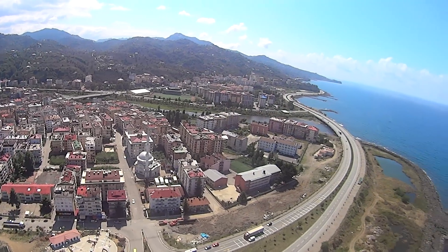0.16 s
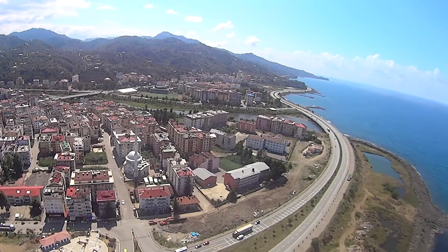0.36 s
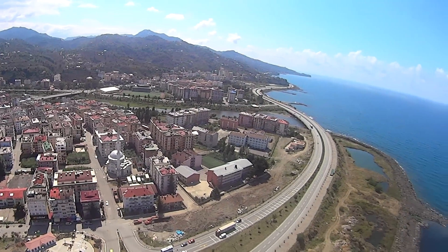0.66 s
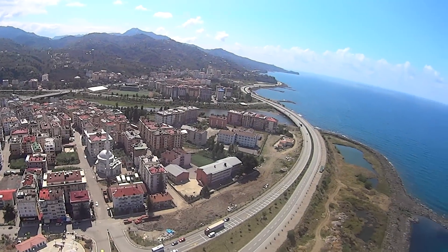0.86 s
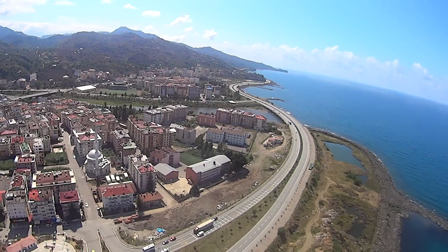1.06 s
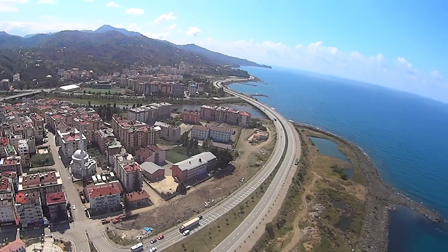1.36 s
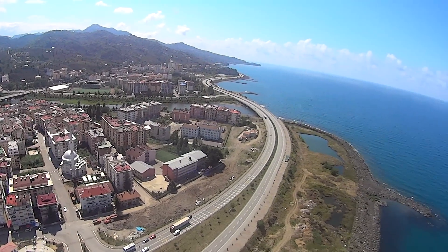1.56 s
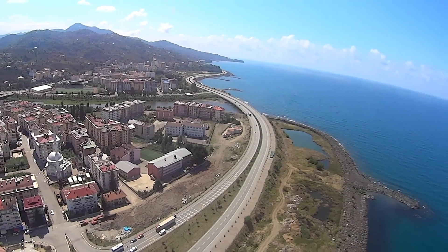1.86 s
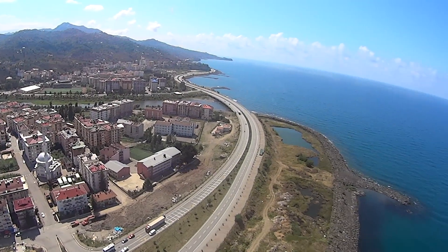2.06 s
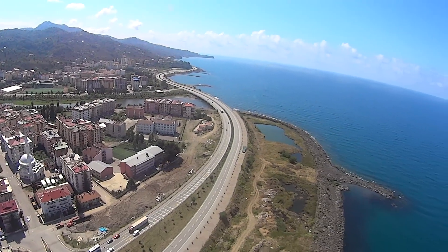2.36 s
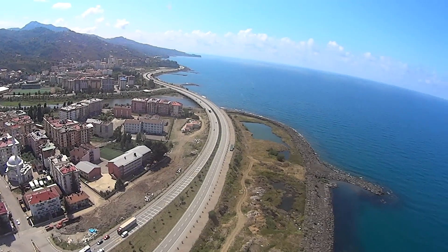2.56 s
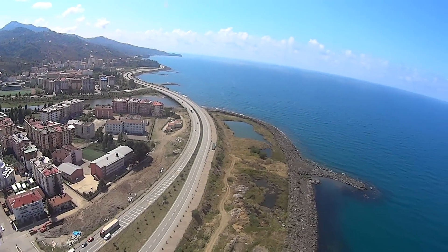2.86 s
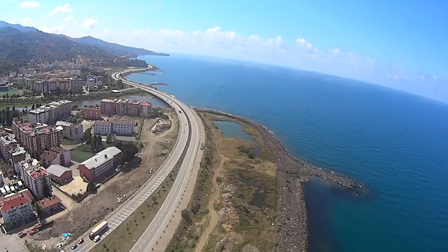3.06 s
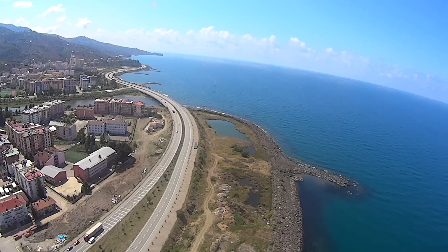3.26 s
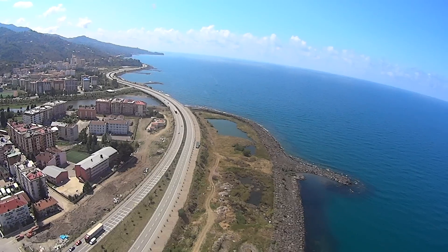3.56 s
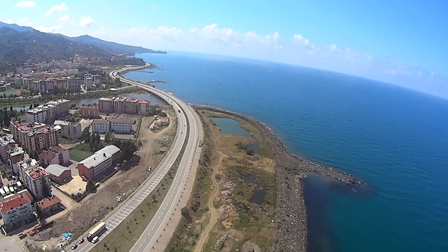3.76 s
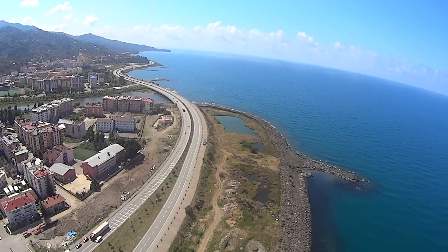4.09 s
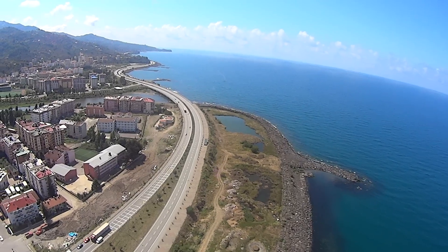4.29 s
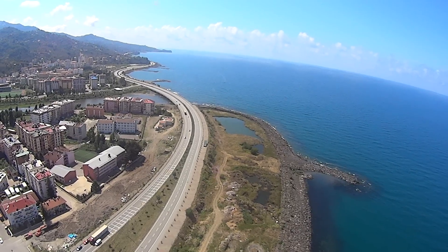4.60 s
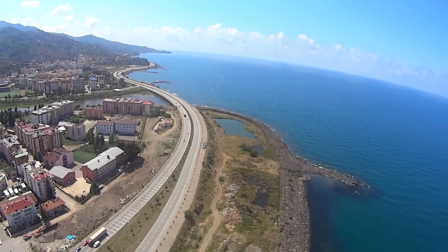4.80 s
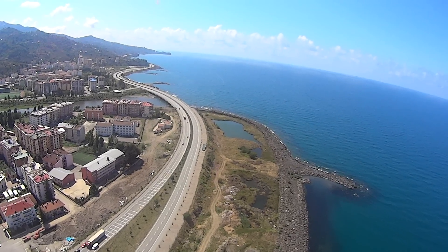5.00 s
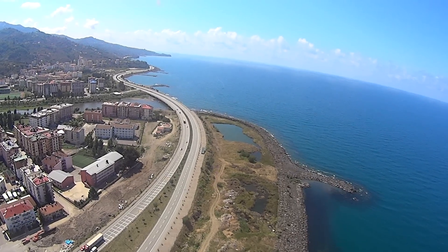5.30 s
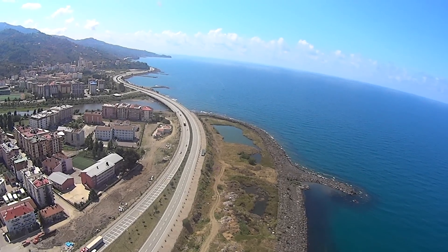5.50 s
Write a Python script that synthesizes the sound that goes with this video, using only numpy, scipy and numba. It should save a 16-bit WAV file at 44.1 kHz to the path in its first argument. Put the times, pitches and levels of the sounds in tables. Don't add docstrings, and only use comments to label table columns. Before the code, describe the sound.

Close drone rotor hum under loud, gusty wind wash, easing to a quiet hover, then spinning up higher with renewed buffeting.

```python
import sys
import numpy as np
from scipy import signal
from scipy.fft import rfft, irfft
from scipy.io import wavfile
from scipy.ndimage import uniform_filter1d
from numba import njit

SR = 44100
rng = np.random.default_rng(int(sys.argv[2]) if len(sys.argv) > 2 else 0)


def ratio(d):
    e = np.asarray(d, float) / 20
    return 10 ** e


def output_pcm(signal):
    pcm = np.clip(np.atleast_2d(signal).T, -1, 1) * 32767
    wavfile.write(sys.argv[1], SR, np.round(pcm).astype(np.int16))


N = 248723
T = np.arange(N) / SR

# hz [Hz], gain_db [dB]
WIDEN = [(60, -14), (110, -12.5), (190, -2), (340, 4), (600, 9), (1070, 10.5), (1910, 10), (3390, 5),
         (6040, -1), (10700, -12)]


def colour(x, table, lag_s=0.):
    hz = np.arange(N // 2 + 1) * SR / N + 1e-9
    point_hz, point_db = np.transpose(table)
    gain = ratio(np.interp(np.log(hz), np.log(point_hz), point_db))
    delay = np.exp(-2j * np.pi * hz * lag_s)
    return irfft(rfft(x) * gain * delay, N)


def band_rms(x, lo_hz, hi_hz):
    band = rfft(x)[int(lo_hz * N / SR):int(hi_hz * N / SR)]
    return np.sqrt(2 * np.sum(np.abs(band) ** 2)) / N


def walk(rate_hz):
    hold = int(SR / rate_hz)
    steps = np.repeat(rng.standard_normal(N // hold + 1), hold)
    return 1.3 * uniform_filter1d(uniform_filter1d(steps, hold), hold)[:N]


def fade(times_s, edge_s=.04):
    opening = T - times_s[0] + edge_s
    closing = times_s[-1] + edge_s - T
    return np.clip(np.minimum(opening, closing) / edge_s, 0, 1)


def curve(table):
    s, *columns = np.transpose(table)
    return [np.interp(T, s, column) for column in columns]


def bumps(table):
    s, length_s, height = np.transpose(table)[:, :, None]
    return height * np.exp(-(2 * (T - s) / length_s) ** 2)


def spells(table, rest_db):
    swells = bumps([(s, length_s, ratio(db)) for s, length_s, db in table]).sum(0)
    return 20 * np.log10(ratio(rest_db) + swells)


def tone(phase, lead_rad, db):
    return np.sqrt(2) * ratio(db) * np.sin(phase + np.array([[.5], [-.5]]) * lead_rad)


def widen(left, right):
    mid = (left + right) / 2
    side = colour((left - right) / 2, WIDEN)
    return mid, np.array([mid + side, mid - side])


def near_rotor():
    # time_s, shaft_hz
    speed = [(0, 109), (.84, 110), (1.0, 111.7), (1.65, 112.6), (2.1, 111.4), (2.25, 110), (2.52, 109.6),
             (2.8, 104.4), (3.1, 102), (3.36, 102.7), (3.5, 107.3), (3.64, 116.5), (3.78, 121.2),
             (4.06, 128.3), (4.4, 131.5), (5.04, 133.3), (5.18, 138.7), (5.32, 153.8)]
    # time_s, shaft_order_db, blade_order_db
    load = [(0, -33, -21), (.15, -23, -15), (.84, -22.4, -19), (1.05, -36.5, -19.5), (1.24, -17.5, -21),
            (1.45, -24.5, -23), (1.65, -19, -28.5), (2.1, -21, -38), (2.5, -24, -42), (2.66, -30.5, -34.5),
            (3.45, -31, -39), (3.75, -16, -29), (3.92, -17.5, -44), (4.08, -14.3, -26.5),
            (4.38, -14, -35.5), (4.88, -14.5, -26.5), (5.04, -22.5, -28), (5.32, -30, -49)]
    # centre_s, length_s, level_db
    third = [
        (.25, 0.62, -26.5),
        (.84, .2, -27.5),
        (1.33, 0.34, -23.5),
        (1.7, 0.21, -24),
        (2.096, 0.26, -28.5),
        (4.15, .3, -26),
        (4.4, 0.39, -26),
    ]
    (hz,), (first_db, second_db) = curve(speed), curve(load)
    third_db = spells(third, rest_db=-59.5)
    fourth_db = second_db - 14.5
    lead_ms = .72 - .012 * np.clip(second_db - first_db, -20, 10)
    angle = 2 * np.pi * np.cumsum(hz * (1 + 0.0034 * walk(29.9))) / SR
    out = 0
    for order, db in enumerate([first_db, second_db, third_db, fourth_db], 1):
        phase = order * angle + np.pi / 2 + .06 * order * walk(40)
        lead_rad = 2 * np.pi * order * hz * lead_ms / 1000
        out = out + tone(phase, lead_rad, db + 0.5 * order * walk(24.67))
    return fade(np.transpose(load)[0]) * out, angle


@njit
def swirl(start, hz, size, cycles, count):
    y = np.zeros(count)
    for k in range(len(start)):
        w = 2 * np.pi * hz[k] / SR
        half = int(3 * np.pi * cycles / w)
        for i in range(min(2 * half, count - start[k])):
            u = w * (i - half)
            y[start[k] + i] += size[k] * np.exp(-(u / (np.pi * cycles)) ** 2) * np.sin(u)
    return y


def eddy_port(angle, gust_db, bright_db, count=16000):
    # hz [Hz], density_db [dB per Hz]
    spectrum = [(100, -0.5), (200, 2.5), (400, -6), (800, -14), (1600, -23.5), (3000, -28.5), (4500, -39.5),
                (6000, -52.5), (8000, -60)]
    when, smallness, strength, sign = rng.random((count, 4)).T
    start = (when * (N - 1)).astype(np.int64)
    hz = 150 * (5500 / 150) ** smallness
    point_hz, point_db = np.transpose(spectrum)
    base_db = np.interp(np.log(hz), np.log(point_hz), point_db) + 20 * np.log10(hz / 1000)
    bright_share = np.clip(np.log(hz / 900) / np.log(2800 / 900), -.3, 1.6)
    uneven_db = (1.25 + 2.07 * smallness) * np.minimum(-np.log(1 - strength), 5.5)
    uneven_db = uneven_db + (0.11 + 0.3 * smallness) * gust_db[start]
    turn_db = 2.7 * np.cos(angle[start]) + 2.4 * np.cos(2 * angle[start])
    db = base_db + bright_share * bright_db[start] + uneven_db + turn_db
    return swirl(start, hz, ratio(db) * np.sign(sign - .5), .6, count=N)


def wash(angle, eddy_db, tilt_db):
    flutter_db = 0.32 * walk(29.6) + 3.9 * walk(150)
    shared, left, right = (eddy_port(angle, flutter_db, tilt_db) for _ in range(3))
    shifted = colour(shared, [(1, 0.0056), (2, 0.0058)], lag_s=-0.000043)
    mid, ports = widen(left + 0.75 * shared, right + 0.73 * shifted)
    return ratio(eddy_db + 0.98) * ports / band_rms(mid, 420, 2250)


def slaps():
    # time_s, peak_db, pitch_hz, left_minus_right_db
    strong = [(0.1134, -22, 914, 7), (0.35, -25, 975, -6), (0.8242, -21, 982, -3.5), (1.7273, -34, 1250, 2),
              (1.8674, -14, 990, -1), (2.1789, -16, 1080, -1.5), (2.2871, -13.5, 1500, -0.5),
              (2.4046, -24, 1260, -6), (2.5533, -25, 1350, 0.5), (3.506, -33, 1670, 5),
              (3.5744, -17, 1160, 2), (3.68, -14.5, 1060, 1.5), (3.725, -15.5, 966, 0.5),
              (3.7673, -23, 970, 3.5), (3.8821, -15.5, 1260, 0), (3.9469, -18, 1000, -0.5),
              (4.1904, -25, 1030, 4.5), (4.2065, -28, 994, -1), (4.3929, -23.5, 902, 1),
              (4.5575, -25.5, 1400, 0), (4.9022, -17.5, 1150, 0.5)]
    # time_s, peak_db, pitch_hz, left_minus_right_db
    slow = [
        (2.554, -20, 458, -4.5),
        (2.641, -18, 390, -1.5),
        (2.689, -26, 517, 4),
        (3.503, -15.5, 422.7, 0),
    ]
    s, db, hz, pan_db = np.transpose(strong + slow)
    chance = rng.random((len(s), 4))
    delay_s = 0.00569 * chance * np.arange(4) / 3
    start = ((s[:, None] + delay_s) * SR).astype(np.int64).ravel()
    pitch_hz = (hz[:, None] * 2 ** (2.4 * chance - 1.1)).ravel()
    size_db = np.repeat(db, 4) - 5 * np.log2(pitch_hz / np.repeat(hz, 4))
    lean_db = 1.3 * np.repeat(pan_db, 4)
    left = swirl(start, pitch_hz, ratio(size_db + lean_db), 0.62, count=N)
    right = swirl(start, pitch_hz, ratio(size_db - lean_db), 0.62, count=N)
    return widen(left, right)[1]


def gliding_lines(table, lead_rad, octave_db, wobble, swell_db, speed, gain_db):
    out = 0
    for start_s, end_s, from_hz, to_hz, peak_db in table:
        part = np.clip((T - start_s) / (end_s - start_s), 0, 1)
        hz = (from_hz + (to_hz - from_hz) * part) * speed
        turns = np.cumsum(hz * (1 + wobble * walk(24.43))) / SR
        phase = 2 * np.pi * (turns + rng.random())
        db = peak_db + gain_db - swell_db * (2 * part - 1) ** 2 + 1.2 + .8 * walk(20)
        octave = tone(2 * phase, 1.94 * lead_rad, db + octave_db)
        out = out + fade((start_s, end_s)) * (tone(phase, lead_rad, db) + octave)
    return out


def other_rotors(gain_db):
    # start_s, end_s, from_hz, to_hz, level_db
    lines = [
        (2.75, 3.5, 226, 221, -39),
        (2.75, 3.5, 237, 235, -37),
        (2.75, 3.62, 243, 251, -36),
        (2.75, 3.5, 258, 261, -37),
        (3.55, 3.8, 230, 246, -32),
        (3.5, 3.8, 273, 293, -38),
        (4.9, 5.64, 251, 246.5, -26),
        (4.9, 5.64, 279, 273, -28),
        (5.25, 5.64, 117, 125, -30),
    ]
    kick = 1 + bumps([(5.25, 2 * 0.1735, 0.0482)])[0]
    return gliding_lines(lines, 1.1, -14.5, 0.00034, swell_db=1.8, speed=kick, gain_db=0.84 * gain_db)


def whines():
    # start_s, end_s, from_hz, to_hz, peak_db
    lines = [
        (3.64, 3.83, 4781, 4629, -50),
        (3.7, 3.84, 4530, 4450, -51),
        (3.48, 3.62, 5190, 5170, -51),
        (5.48, 5.75, 4420, 4500, -49),
        (4.5, 5.22, 4880, 4890, -63),
        (5.47, 5.64, 5497, 5400, -57),
        (4.05, 4.17, 2770, 2680, -61),
    ]
    return gliding_lines(lines, .2, -40, .001, swell_db=7, speed=1, gain_db=0)


def hover():
    # pitch_hz, level_db
    orders = [(411, -47), (495, -44), (619.1, -53), (433, -50), (1276, -56), (1534, -58), (1647, -56),
              (1776, -59), (2261, -63), (2606, -63), (4204, -65), (4452, -63), (4936, -63), (5206, -63)]
    drift_s = np.cumsum(1 + .004 * walk(10)) / SR
    out = sum(tone(2 * np.pi * hz * drift_s, 1.3, db + 3 * walk(20)) for hz, db in orders)
    return fade((2.7, 3.5), edge_s=.15) * out


def motors(angle, hiss_db):
    # hz [Hz], density_db [dB per Hz]
    spectrum = [(80, -8), (180, -12.5), (320, -38.5), (480, -5.5), (600, -18), (1600, -15.5), (2300, -20),
                (3700, -28.5), (4800, -25.5), (6000, -28.5), (7600, -32), (8600, -29.5), (11200, -36.5)]
    # pitch_hz, level_db
    switching = [(6422, -63), (6616, -63), (7666, -70), (8043, -60), (8059, -53), (8166, -66), (8269, -63),
                 (8775, -68), (8893, -70), (9717, -68)]
    throb = ratio(1.6 * np.cos(2 * angle) + 0.91 * walk(17))
    near, left, right = (colour(rng.standard_normal(N) * throb, spectrum) for _ in range(3))
    turned = colour(signal.hilbert(near).imag, [(100, 7.5), (1000, 1.5), (3000, -3), (6000, -7)])
    loose = [(100, -12), (1500, -9), (4000, 1.5), (10000, 0)]
    out = np.array([near - turned + colour(left, loose), near + turned + colour(right, loose)])
    out = out * ratio(hiss_db - 2.5) / band_rms(out.mean(0), 8830, 10130)
    for hz, db in switching:
        phase = 2 * np.pi * (hz * T + .1 * walk(40))
        out = out + tone(phase, .6, db + hiss_db + 52 + 3.5 * walk(40))
    return out


def rumble(rumble_db):
    # hz [Hz], density_db [dB per Hz]
    spectrum = [(15, -31), (30, -13.5), (60, 13), (100, 17.5), (170, 14), (300, -7), (600, -65)]
    mid, side = (colour(rng.standard_normal(N) * ratio(0.45 * walk(40)), spectrum) for _ in range(2))
    side = ratio(-11.0) * side
    return ratio(rumble_db - 10.5) * np.array([mid + side, mid - side]) / band_rms(mid, 35, 90.0)


def scene():
    # time_s, level_db
    wash_levels = [(0, -24), (.6, -26), (1.0, -25), (1.6, -24), (1.85, -23.5), (2.2, -26.5), (2.5, -28.5),
                   (2.62, -39), (2.8, -51), (3.2, -54), (3.46, -50.5), (3.6, -32), (3.85, -29.5),
                   (4.1, -37), (4.4, -39.5), (4.85, -34.5), (5.12, -29.5), (5.64, -32.5)]
    # time_s, hiss_db
    hiss_levels = [(0, -70.5), (.6, -62.5), (1.3, -58.5), (1.75, -63.5), (2.28, -70), (2.6, -57.5),
                   (3.0, -53.5), (3.5, -47.5), (3.72, -51.5), (3.9, -70), (4.05, -63.5), (4.95, -60.5),
                   (5.2, -57), (5.64, -52.5)]
    # centre_s, length_s, wash_lift_db
    gusts = [(.69, 0.026, 2.5), (1.18, 0.026, 1.5), (1.74, 0.02, 2), (2.16, 0.057, 1.5), (2.31, 0.027, 3),
             (2.39, 0.087, 2.5), (2.49, 0.028, 2), (2.56, 0.034, 7.5), (2.61, 0.033, 5.5), (2.7, 0.038, 12),
             (3.5, .03, 7.5), (3.565, 0.028, 9), (3.71, 0.084, 3), (3.79, 0.017, 3), (4.05, 0.035, 3.5),
             (3.9, 0.026, 4), (3.945, 0.0077, 6), (4.21, 0.05, 6.5), (4.9, 0.016, 6), (4.98, 0.035, 1.5),
             (5.1, 0.032, 4), (5.2, 0.12, 4), (5.26, 0.021, 3), (5.36, 0.018, 6), (5.48, .03, 2.5),
             (5.56, 0.14, 5)]
    # centre_s, length_s, rumble_db
    buffets = [(.25, .03, -36), (.66, .05, -13), (.75, .08, -17.5), (0.848, .03, -22), (0.977, 0.1, -16),
               (1.15, 0.11, -16), (1.4, 0.23, -19), (1.716, .05, -23), (2.47, .1, -23), (2.716, .07, -30),
               (3.196, 0.092, -43), (3.5, 0.082, -32), (3.62, .14, -19.5), (3.86, 0.043, -24),
               (4.62, .1, -36), (4.98, .05, -23), (5.087, .03, -36)]
    (wash_db,), (hiss_db,) = curve(wash_levels), curve(hiss_levels)
    gain_db = hiss_db + 55
    gust_db = bumps(gusts).sum(0)
    tilt_db = np.clip(1.28 * (wash_db + 25.5) - 0.28 * (gain_db + 8.5), -18, 1.5)
    tilt_db = tilt_db + 1.41 * gust_db
    rumble_db = spells(buffets, rest_db=-41.5) + 3 * walk(15)
    hum, angle = near_rotor()
    air = wash(angle, wash_db + gust_db, tilt_db) + slaps()
    lines = other_rotors(gain_db) + whines() + hover()
    return hum + air + lines + motors(angle, hiss_db) + rumble(rumble_db)


def top_cut(x):
    return signal.sosfilt(signal.butter(12, 12290, fs=SR, output="sos"), x)


def record(dry):
    # time_s, peak_db
    overloads = [(0.0687, -63), (0.1865, -66), (0.3152, -74), (0.3516, -66), (0.4299, -71), (0.6335, -66),
                 (0.824, -62), (0.9597, -77), (1.0999, -64), (1.536, -67), (1.8148, -69), (2.359, -75),
                 (2.4039, -71), (5.1088, -63)]
    x = np.tanh(0.6 * dry) / 0.6
    x = signal.sosfilt(signal.ellip(12, .2, 70, 11020, fs=SR, output="sos"), x)
    s, db = np.transpose(overloads)
    ticks = np.zeros(N)
    ticks[(s * SR).astype(int)] = ratio(db + 23)
    mix = np.clip(x + ticks * np.array([[1.6], [.4]]), -.93, .93)
    return top_cut(mix)


dry = scene()
out = record(dry)
output_pcm(out)
```